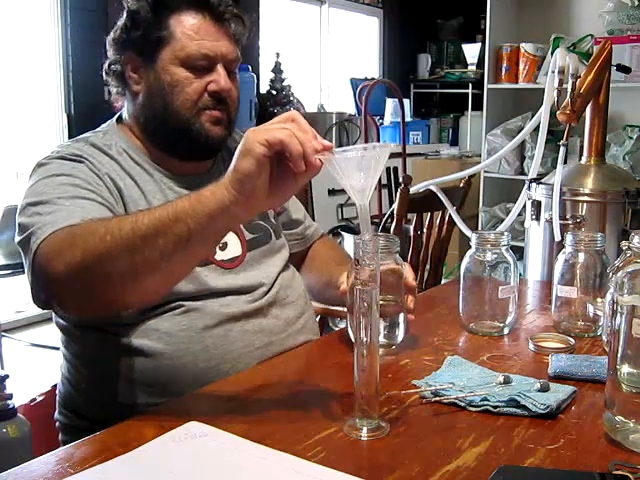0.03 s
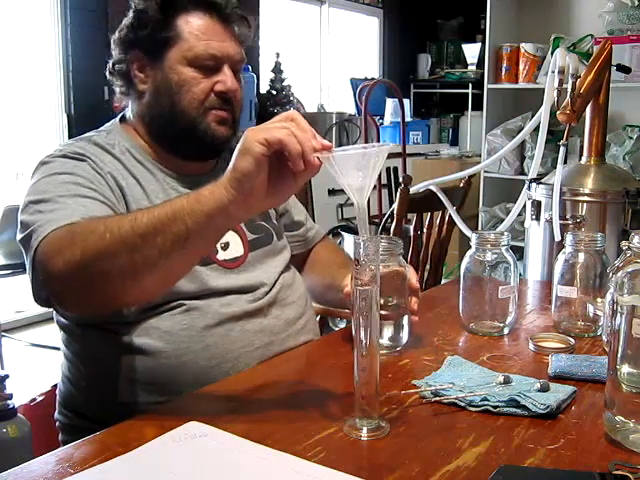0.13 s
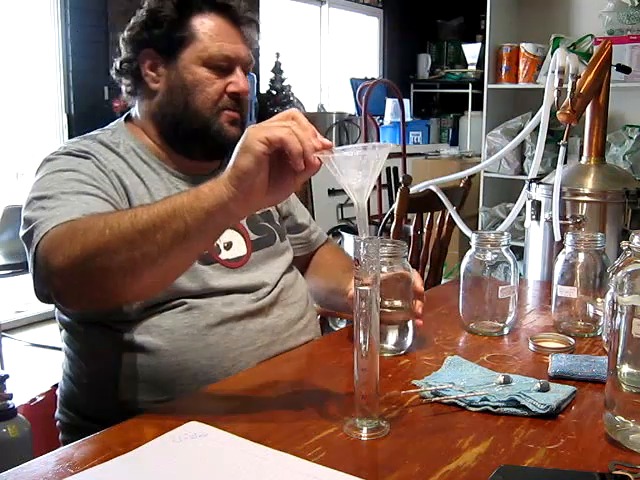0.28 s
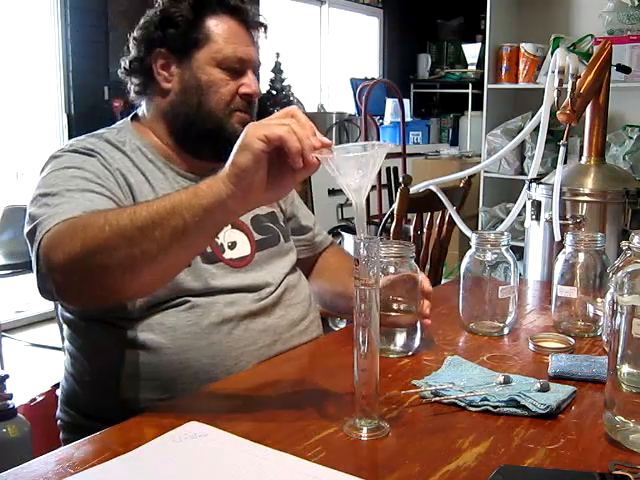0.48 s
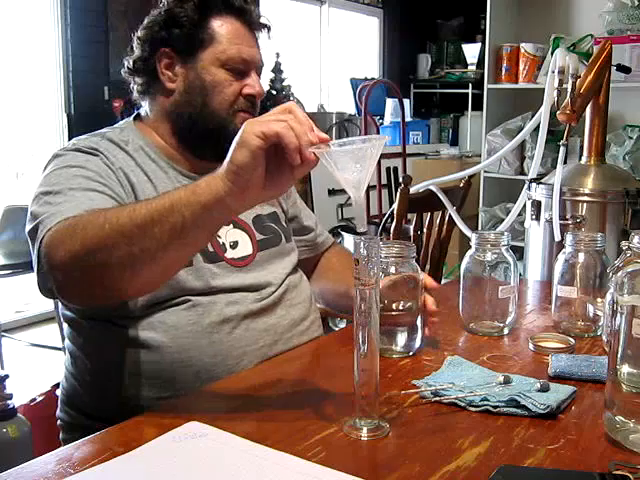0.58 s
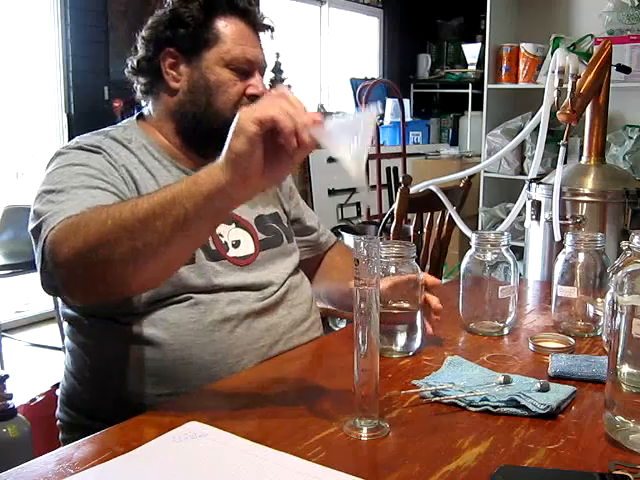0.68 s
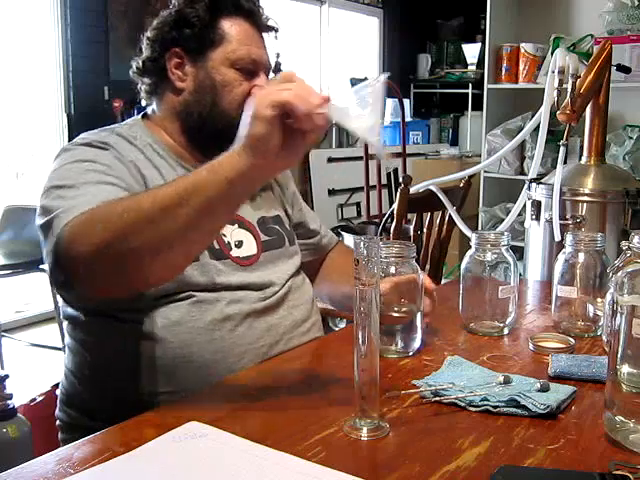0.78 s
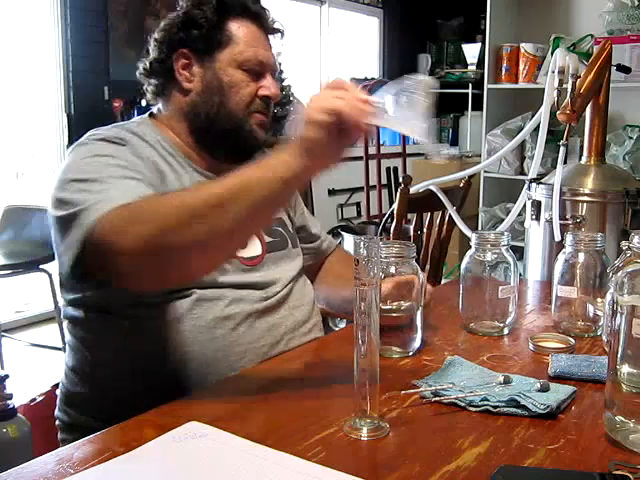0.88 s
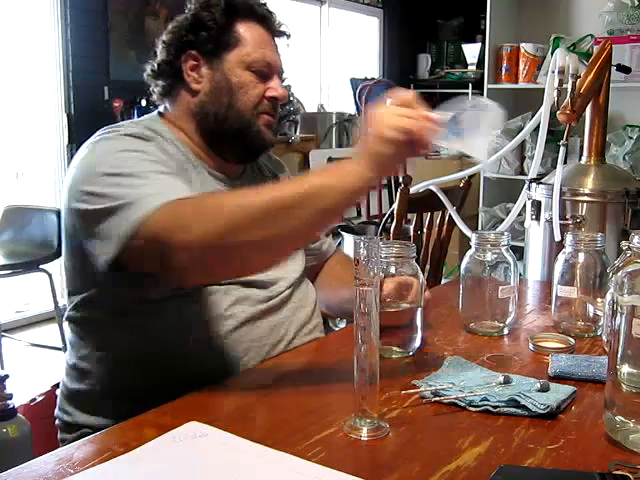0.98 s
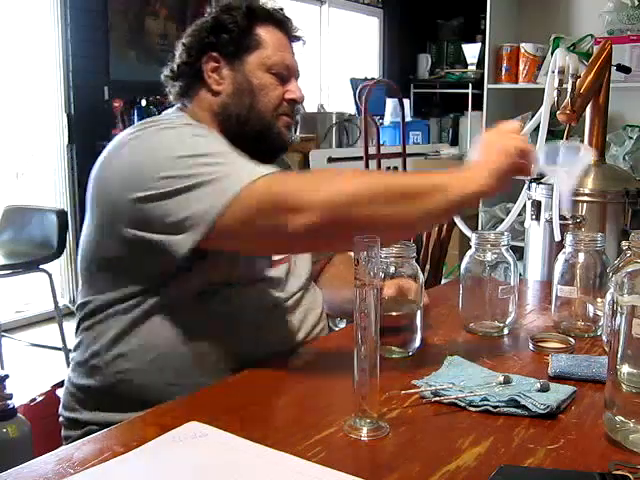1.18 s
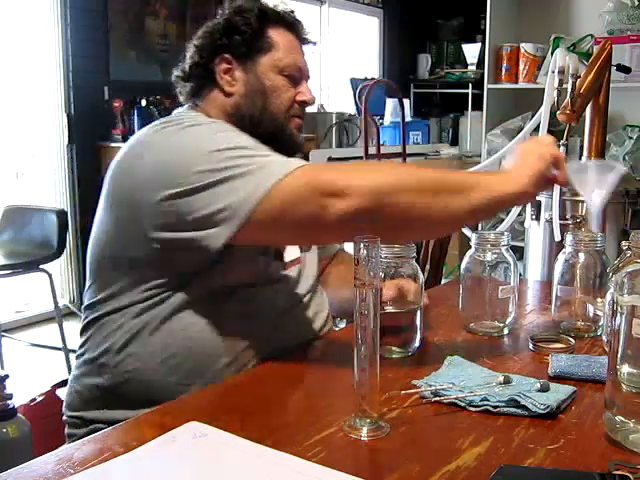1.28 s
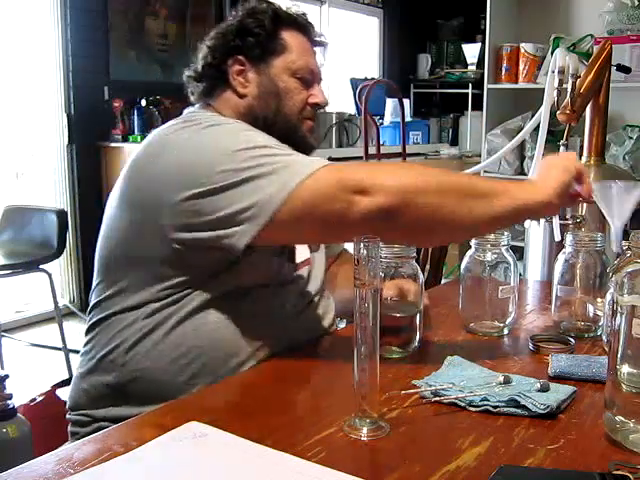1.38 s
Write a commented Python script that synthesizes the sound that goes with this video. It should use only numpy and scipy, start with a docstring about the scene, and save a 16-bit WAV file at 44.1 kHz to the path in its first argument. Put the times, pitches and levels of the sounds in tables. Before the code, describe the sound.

A plastic funnel taps a glass cylinder's rim at about 0.2 seconds and again at 0.4, the second tap duller with a slight rebound. Each knock booms briefly through a wooden table and rings in a small room. Near 0.8 seconds comes a soft, hollow bump as the funnel lifts, then a faint glass squeak. Low hiss and a thin electrical whine continue throughout.

```python
"""Tapping a funnel dry

A plastic funnel is tapped twice on the rim of a tall glass cylinder to shake off its drops.
The knocks go down into the wooden table, which booms, and a small room answers.
A soft bump and a faint squeak follow as the funnel is lifted away, over hiss and a thin whine."""
import sys
import numpy as np
from scipy import signal
from scipy.fft import rfft, irfft, next_fast_len
from scipy.io import wavfile
from scipy.ndimage import map_coordinates

SR = 44100
rng = np.random.default_rng(int(sys.argv[2]) if len(sys.argv) > 2 else 0)


def wav_out(sig):
    """Save sig, one row per channel (or a flat mono array), as 16-bit PCM at SR to the path in sys.argv[1]."""
    wavfile.write(sys.argv[1], SR, np.round(np.clip(np.atleast_2d(sig).T, -1, 1) * 32767).astype(np.int16))


N = 63945

# Two taps and a soft rebound. Each row: start in seconds, level in dB, treble cut-off in Hz,
# then bass, hollow middle, room and wall echo adjustments in dB, and echo delay in seconds.
FUNNEL_TAPS = [(0.2376, -12.5, 2960, 1, -1, -2, -32.5, .024),
               (0.4052, -13.5, 1038, -0.5, 4.5, 0, -29.5, .016),
               (0.4290, -20, 860, 2, 4, -3.5, -35.5, 0.016)]

def funnel_taps():
    """Each tap on the rim cracks, rings the table and stirs the room."""
    out = np.zeros(N)
    for start, db, cutoff_hz, bass_db, hollow_db, room_db, wall_db, wall_delay in FUNNEL_TAPS:
        knock = table_boom(start) + rim_crack(start) + amp(room_db) * room_answer(start)
        knock = filtered(knock, lambda hz: contact_tone(hz, cutoff_hz, bass_db, hollow_db))
        echo = amp(wall_db) * wall_echo(start + wall_delay)
        out += amp(db) * (knock + echo)
    return out


def contact_tone(hz, cutoff_hz, bass_db, hollow_db):
    """A softer blow is duller, and the spot struck sets the bass and the hollow middle."""
    low_cut_hz, bass_hz, hollow_hz, width_hz = 89, 260, 560, 230
    dull = 1 / (1 + 1j * np.sqrt(2) * hz / cutoff_hz - (hz / cutoff_hz) ** 2)
    bass = (amp(bass_db) + 1j * hz / bass_hz) / (1 + 1j * hz / bass_hz)
    middle_band = 1j * hz * width_hz / (hollow_hz ** 2 - hz ** 2 + 1j * hz * width_hz)
    hollow = 1 + (amp(hollow_db) - 1) * middle_band
    ratio = 1j * hz / low_cut_hz
    low_cut = ratio ** 2 / (1 + ratio + ratio ** 2)
    return dull * bass * hollow * low_cut


# The notes of the table with the cylinder on it.
# Each row: pitch in Hz, relative level in dB, seconds to fade by 60 dB.
TABLE_NOTES = [(81, -20, 0.18), (133, -7, 0.29), (164, -5, 0.031), (253.7, -18.5, 0.52), (288, 7, 0.03),
               (357.6, -9.5, 0.51), (405.8, -9.5, .28), (517, -16.5, 0.32), (616.8, -28.5, 0.19),
               (665, -10.5, 0.032), (829.7, -13, 0.18), (926, -7, 0.011), (1404, -4.5, 0.017),
               (1705, -9, .02), (2700, -11.5, 0.0086)]

def table_boom(start):
    """The knocked table rings at many pitches at once, each fading at its own speed."""
    out = np.zeros(N)
    for k, (hz, db, fade_s) in enumerate(TABLE_NOTES):
        gain = amp(db + 0.5 * rng.standard_normal())
        tone = (-1) ** k * np.sin(2 * np.pi * hz * since(start))  # every other note is flipped
        out += gain * burst(start, rise_s=0.34 / hz, fade_s=fade_s) * tone
    return out


# The tone of the crack. Each row: frequency in Hz, relative level in dB.
CRACK_TONE = [(200, -21.5), (600, 10), (1500, -3), (3200, 0), (4500, -27), (8000, -21.5), (11000, -51.5)]

def rim_crack(start):
    """Plastic hitting glass gives a very short burst of noise."""
    return amp(-6.5) * noise(CRACK_TONE) * burst(start, rise_s=0.0001, fade_s=0.013)


# The tone of the room's answer. Each row: frequency in Hz, relative level in dB.
ROOM_TONE = [(30, -25.5), (60, -25), (85, -3.5), (140, 0), (210, 0.5), (300, 0), (430, -3.5), (600, -8.5),
             (850, -10.5), (1100, -16), (1500, -17), (2200, -19.5), (4000, -32.5), (7500, -46),
             (10000, -47.5)]
# How long the room rings. Each row: frequency in Hz, seconds to fade by 60 dB.
ROOM_FADES = [(80, 0.51), (300, 0.42), (1000, 0.47), (3000, 0.48), (8000, 0.36)]

def room_answer(tap_start):
    """Reflections blur into a wash of noise in which each frequency dies at its own speed."""
    start, rise_s = tap_start + 0.0013, 0.0027
    hz, t, bands = signal.stft(noise(ROOM_TONE), SR, nperseg=1024)
    fade = amp(-60 * np.maximum(t - start, 0) / along(ROOM_FADES, hz)[:, None])
    tail = signal.istft(bands * fade, SR, nperseg=1024)[1][:N]
    return amp(-9) * tail * (1 - np.exp(-since(start) / rise_s))


# The tone of the echo. Each row: frequency in Hz, relative level in dB.
WALL_TONE = [(500, -23.5), (2000, -2), (4000, 2.5), (7000, -20.5), (10000, -48.5)]

def wall_echo(start):
    """The walls throw back a bright early echo."""
    return noise(WALL_TONE) * burst(start, rise_s=0.002, fade_s=0.13)


# The tone of the bump. Each row: frequency in Hz, relative level in dB.
BUMP_TONE = [(100, -29), (370, -14.5), (530, 2.5), (640, -6.5), (760, 2), (1050, -9), (1500, -16),
             (2200, -15), (2900, -16), (5000, -43), (9000, -77)]

def funnel_bump():
    """The funnel comes away with a soft, hollow bump, heard mostly through the room."""
    return amp(-37) * noise(BUMP_TONE) * burst(start=0.764, rise_s=0.0015, fade_s=0.43)


# The tone of the squeak. Each row: frequency in Hz, relative level in dB.
SQUEAK_TONE = [(800, -13.5), (1600, -17), (1725, 0.5), (1850, -14), (2100, -12), (2500, -36), (9000, -83)]

def glass_squeak():
    """Handled glass squeaks faintly, heard mostly through the room."""
    return amp(-41.5) * noise(SQUEAK_TONE) * burst(start=0.846, rise_s=0.037, fade_s=0.46)


# The tone of the hiss. Each row: frequency in Hz, relative level in dB.
HISS_TONE = [(15, -49.5), (25, -9.5), (64, -1.5), (103, -5.5), (186, -2), (214, -7.5), (236, -6),
             (467, -4.5), (502, -6.5), (650, -7), (785, -6), (1350, -8.5), (2880, -9.5), (3090, -8),
             (3320, -12.5), (4510, -14), (7060, -32.5), (9180, -58.5), (15500, -120)]
# The notes of the whine. Each row: pitch in Hz, average level in dB.
WHINE_NOTES = [(3043.5, -59.5), (7978, -92.5)]

def hiss_and_whine():
    """Hiss slowly swells behind a thin electrical whine that wavers a little."""
    drift_hz, waver_db, swell_db_per_s = 1.5, 1, 1
    whine = np.zeros(N)
    for hz, db in WHINE_NOTES:
        peak = np.sqrt(2) * amp(db - waver_db * wobble(12))
        pitch = hz + drift_hz * wobble(8.7)
        whine += peak * np.sin(2 * np.pi * np.cumsum(pitch) / SR)
    hiss = amp(-51.5 + swell_db_per_s * since(0)) * noise(HISS_TONE)
    return hiss + whine


def amp(db):
    """Turn decibels into a multiplier."""
    return 10 ** (np.asarray(db) / 20)


def along(points, hz):
    """Read between a table's rows on a log frequency scale."""
    row_hz, values = np.transpose(points)
    return np.interp(np.log(hz + 1), np.log(row_hz + 1), values)


def since(start):
    """Seconds since a moment, zero before it."""
    return np.maximum(np.arange(N) / SR - start, 0)


def wobble(rate):
    """A smooth curve through `rate` random points a second."""
    return map_coordinates(rng.standard_normal(200), [np.arange(N) * rate / SR], mode="mirror")


def filtered(x, response):
    """Scale each frequency in x by response(hz)."""
    size = next_fast_len(N + SR // 2)
    return irfft(rfft(x, size) * response(np.fft.rfftfreq(size, 1 / SR)), size)[:N]


def noise(tone):
    """Noise shaped by a tone table, with an average (rms) level of 1."""
    x = filtered(rng.standard_normal(N), lambda hz: amp(along(tone, hz)))
    return x / np.sqrt(np.mean(x ** 2) + 1e-20)


def burst(start, rise_s, fade_s):
    """A loudness curve that rises, then falls 60 dB every fade_s seconds."""
    t = since(start)
    return (1 - np.exp(-t / rise_s)) * amp(-60 * t / fade_s)


def scene():
    """Add all the sounds into one channel."""
    return (funnel_taps() + funnel_bump() + glass_squeak() + hiss_and_whine())[None]


def record(dry):
    """Cut away the highest treble."""
    return filtered(dry[0], lambda hz: hz < 10200)[None]


dry = scene()
out = record(dry)
wav_out(out)
```